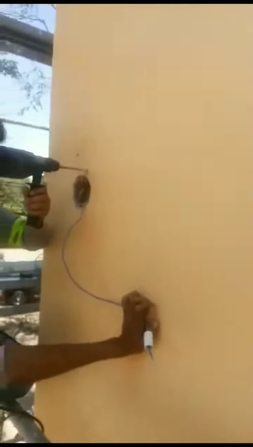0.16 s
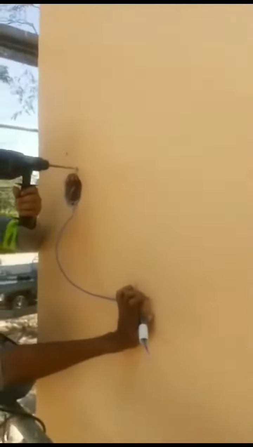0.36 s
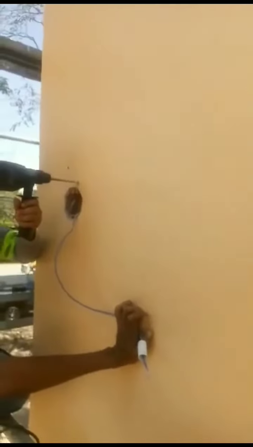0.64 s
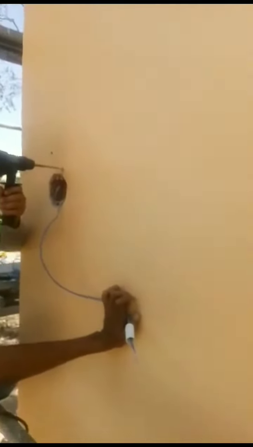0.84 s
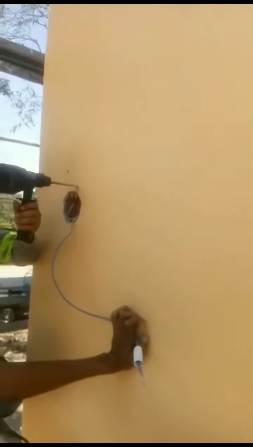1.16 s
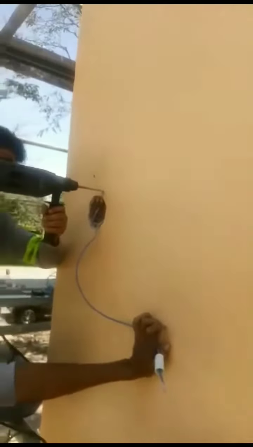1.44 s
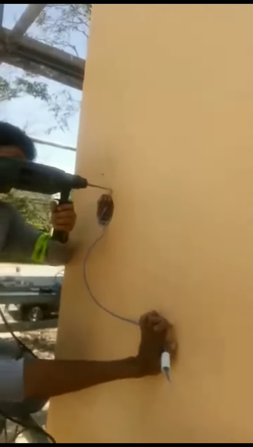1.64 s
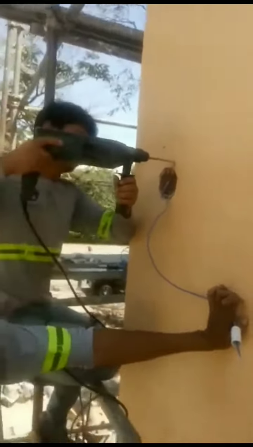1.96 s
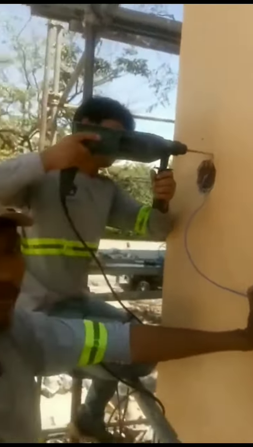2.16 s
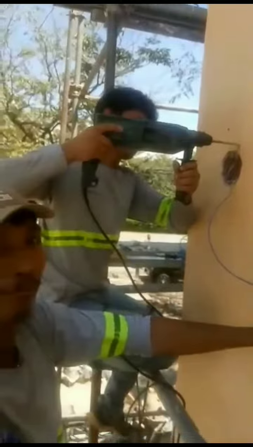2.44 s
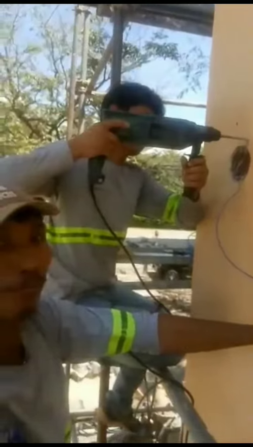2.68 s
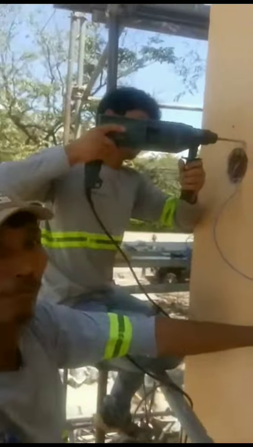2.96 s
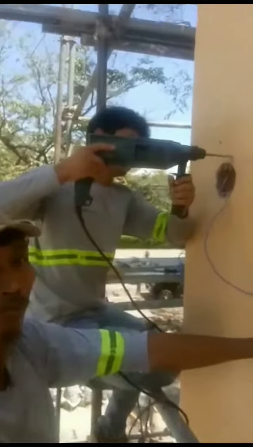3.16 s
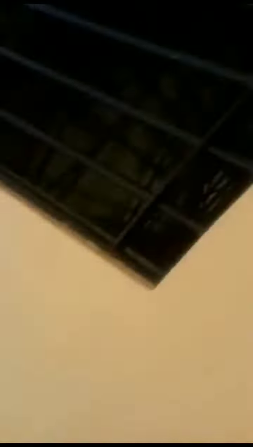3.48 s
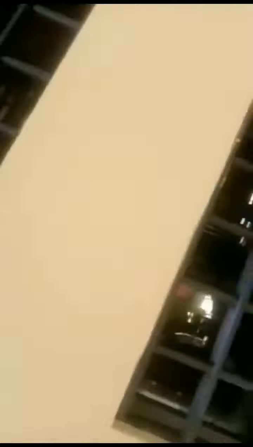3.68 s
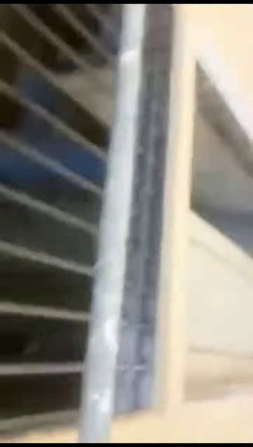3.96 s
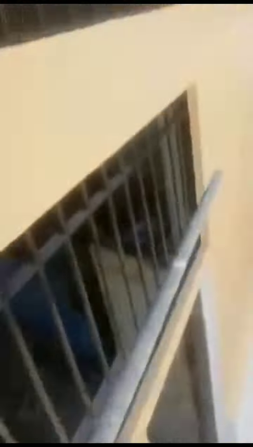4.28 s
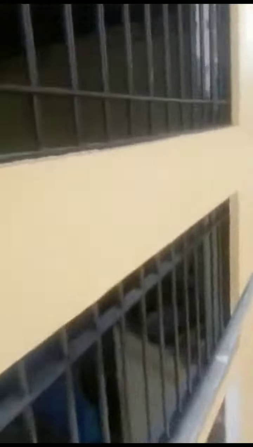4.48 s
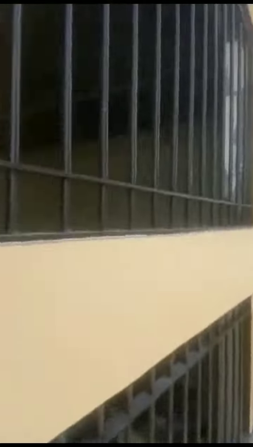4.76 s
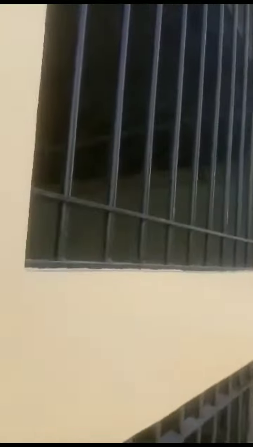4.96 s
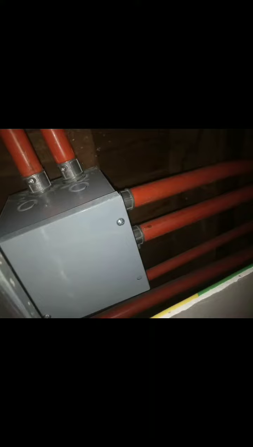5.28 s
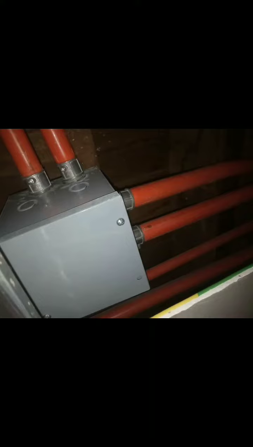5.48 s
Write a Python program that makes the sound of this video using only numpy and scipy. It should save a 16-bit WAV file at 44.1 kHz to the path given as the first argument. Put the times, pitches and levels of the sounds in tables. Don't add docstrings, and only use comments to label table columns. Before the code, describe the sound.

Harsh, buzzing hammer drilling in masonry, close to a hand-held phone, with small bumps on the casing and a sudden stop to silence.

```python
import sys
import numpy as np
from scipy import signal
from scipy.fft import rfft, irfft
from scipy.io import wavfile
from scipy.ndimage import uniform_filter1d

SR = 44100
rng = np.random.default_rng(int(sys.argv[2]) if len(sys.argv) > 2 else 0)


def generate_wav(signal):
    frames = np.transpose(np.atleast_2d(signal))
    scaled = np.clip(frames, -1, 1) * 32767
    pcm = np.round(scaled).astype(np.int16)
    wavfile.write(sys.argv[1], SR, pcm)


def volts(x):
    e = np.asarray(x, float) / 20
    return 10 ** e


N = 247842

# time in seconds, level in dB.
TOOL_LEVEL = [(0.0, -27), (0.25, -22.5), (0.8, -25), (1.1, -26), (1.7, -26), (2.25, -24), (2.6, -26),
              (3.05, -26), (3.2, -22), (3.65, -28), (3.8, -25.5), (4.05, -23.5), (4.15, -22), (4.45, -22),
              (4.8, -19), (5.05, -19)]
# time in seconds, change in dB, half length in seconds.
BITES_AND_SKIDS = [(0.39, -4, 0.05), (0.782, 2.1, 0.062), (1.247, 2, 0.039), (1.381, 3, 0.027),
                   (1.809, -3, 0.028), (1.93, 2.4, 0.019), (2.08, -2.9, 0.02), (2.393, -2, 0.043),
                   (2.758, -2, 0.011), (2.85, -2.5, 0.011), (2.917, 1.6, 0.03), (4.382, -5, 0.042),
                   (4.485, -4, 0.015), (4.747, -3.5, 0.015)]
# start in seconds, length in seconds.
PUSH_EASES = [
    (1.2483, .1893),
    (1.9122, .3311),
    (3.0655, .3326),
    (3.7391, .3037),
    (4.42, .3838),
]
# time in seconds, direction (0 at the tool, 1 a little aside, 2 turned away,
# 3 along the bars, 4 at the window).
PHONE_SWING = [(0, 0), (1.6, 1.03), (2.5, 1), (3.3, 1), (3.5, 2.5), (3.72, 2.5), (4.0, 3), (4.45, 3),
               (4.7, 3.5), (5.1, 5)]
# 0.8-2.5 kHz in dB, 7-13 kHz in dB, below 0.8 kHz in dB.
BAND_SHARES = [
    (-4.5, -7.5, -17.5),
    (-7, -10, -19.5),
    (-8, -4, -19),
    (-12, -8, -19),
    (-9, -8.5, -18),
]
# frequency in Hz, level in dB.
COLOUR_FACING = [(470, -47), (800, -23), (943, -2), (1140, -5), (1220, -2), (1680, -6), (2380, -5.5),
                 (2590, -3), (3310, -0.5), (4230, -11.5), (4930, -3), (6690, -10), (8070, -26),
                 (11200, -10), (13200, -15)]
COLOUR_ASIDE = [(470, -44), (800, -10), (1230, -4), (1560, -7), (1930, -4.5), (2170, -8), (2380, -5.5),
                (3510, -1), (4540, -10), (4930, -1), (5540, -11), (6530, -6), (7700, -12.5), (12200, -8),
                (13200, -15.5)]
COLOUR_AWAY = [(470, -39), (800, -11.5), (1060, 0.5), (1150, -14), (1440, 2), (2020, -4.5), (2350, -12.5),
               (2910, -8), (3270, -13.5), (3990, -11), (10900, -6), (12600, -6), (13200, -8.5)]
COLOUR_BARS = [(470, -44), (800, -10), (1260, -7), (1460, -7.5), (1680, -7), (2020, -11), (2590, -13.5),
               (3050, -4), (3720, -8), (4230, -1), (5540, -10), (6380, -3.5), (7790, -10.5), (12200, -10.5),
               (13200, -12)]
COLOUR_WINDOW = [(470, -43), (800, -15.5), (838, -18.5), (943, -5.5), (1230, -12), (1710, -6.5),
                 (2170, -10), (2380, -10.5), (2770, -16), (3120, -8.5), (4870, -3), (5290, -6.5),
                 (7010, -14), (12600, -16), (13200, -26)]
# frequency in Hz, level per Hz in dB.
BASS_AT_TOOL = [(21, -42.5), (35, 2), (112, -0.5), (405, -6.5), (493, -3), (608, -8), (711, 8.5), (800, -6),
                (1040, -32), (1760, -120)]
BASS_AT_WINDOW = [(21, -50.5), (35, -19), (81, -2), (237, -11), (277, -10), (562, -7), (616, -14.5),
                  (800, -2), (1040, -31), (1760, -120)]
# time in seconds, half length in seconds, frequency in Hz,
# glide in Hz per second, lift in dB.
EDGE_GLINTS = [(3.27, .09, 12000, -3000, 3.5), (3.43, .11, 4900, -11000, -3.5),
               (3.37, .07, 9700, -14000, 9), (3.64, .04, 10400, 6000, -3), (3.791, .11, 11900, 7000, 4.5),
               (4.989, .11, 12900, -0.5, -9)]
# frequency in Hz, level in dB.
GRIND_COLOUR = [(60, 0.5), (500, 1), (1500, 8.5), (4000, 0.5), (7000, 6.5), (12000, 1.5)]
STRIKE_COLOUR = [(60, -30.5), (500, -36.5), (1500, -8.5), (4000, -13.5), (7000, 1), (12000, 1.5)]
TICK_COLOUR = [(60, -40), (2000, -30), (5000, -12), (8000, -7), (12000, -1.5)]
RAM_COLOUR = [(60, -27.5), (500, 5), (1500, -18), (3000, -6.5), (6000, -4), (12000, -6)]
WALL_COLOUR = [(60, -33.5), (400, 2.5), (900, -8), (1300, 2.5), (2500, -10), (5000, -18), (12000, -28.5)]
THUD_COLOUR = [(60, -14), (130, -3), (250, -4), (450, -1.5), (700, 1), (850, -6), (1100, -14), (2000, -30)]
# frequency in Hz, level in dB, time to fall 60 dB in seconds.
BODY_RINGS = [(542, -5, 0.053), (638, -2.5, 0.081), (670.7, 4.5, 0.064), (978.4, 5, 0.11),
              (1225, -9.5, 0.059), (1259, -2.5, 0.17), (1390, 0, 0.05), (1584, 0.5, 0.035),
              (1940, -13, 0.15), (1956, 0.5, 0.23), (2380, -4, 0.04), (2427, 5, 0.14), (2810, -8.5, 0.13),
              (2954, 4, 0.28), (3265, 6, .06), (3413, 4.5, 0.071), (3634, -17.5, 0.1), (4800, 12.5, 0.089),
              (6600, 5.5, 0.034)]
# overtone of the blow rate, level under the tool in dB,
# extra level near the window in dB.
GEAR_LINES = [(1, -36, -4), (2, -34, 1), (4, -33, 4), (6, -34, 6), (8, -31, 11), (11, -31, 2)]
# time in seconds, signed peak, push length in milliseconds.
FINGER_KNOCKS = [(2.112, 0.035, 0.67), (2.140, 0.055, 1), (3.348, -0.13, 0.54), (3.446, 0.059, 0.88),
                 (3.618, -0.14, 0.52), (3.769, .045, 0.62), (3.784, 0.021, 1), (3.859, -0.085, 0.47),
                 (3.903, 0.04, 1.2), (3.931, 0.18, 0.7), (4.179, -0.047, 0.9), (4.189, 0.064, 1.9),
                 (4.207, -0.035, 1.2), (4.229, 0.045, 0.77), (4.254, 0.039, 0.87), (4.27, -0.034, 0.64),
                 (4.782, -0.013, 1), (4.949, 0.044, 2), (5.026, -0.022, 0.63)]
# time in seconds, level in dB.
FRAME_LEVEL = [(3.05, -63), (3.15, -47), (3.6, -54), (3.8, -47.5), (4.3, -46.5), (4.75, -41.5), (4.9, -32),
               (5.0, -38.5), (5.05, -43.5)]
# centre in seconds, length in seconds, lowest frequency in Hz.
TREBLE_SWAPS = [(0.055, .03, 5500), (0.131, .05, 4240), (0.312, 0.037, 5560), (0.409, 0.046, 4200),
                (1.892, 0.032, 4400), (1.977, 0.026, 4200), (2.425, 0.022, 4130), (2.485, 0.028, 4350),
                (2.556, 0.037, 6200), (2.618, 0.023, 5130), (2.789, 0.019, 6200), (2.853, .025, 4230),
                (3.337, 0.041, 7400), (3.449, 0.028, 4970), (3.633, 0.053, 4740), (3.683, 0.021, 4170),
                (3.97, 0.048, 4830), (4.038, 0.046, 4170), (4.133, 0.026, 5800), (4.217, 0.032, 4000),
                (4.296, 0.039, 4800), (4.389, .03, 5060), (4.729, 0.029, 5500), (4.901, 0.025, 5040),
                (5.01, 0.023, 4400), (5.045, 0.031, 5430)]

LOADED_PER_S, FREE_PER_S = 56.91, 73.89


def evened(x):
    return x / np.sqrt(np.mean(abs(x) ** 2) + 1e-20)


def read(points, hz):
    f, value = np.transpose(points)
    return np.interp(np.log(hz + 1), np.log(f + 1), value)


def coloured(x, points):
    hz = np.fft.rfftfreq(N, 1 / SR)
    return irfft(rfft(evened(x)) * volts(read(points, hz)), N)


def clicks(turns, spread_db, jitter_ms):
    at = np.flatnonzero(np.diff(np.floor(turns)))
    chance = rng.standard_normal((len(at), 2))
    late = (chance[:, 0] * jitter_ms * SR / 1000).astype(int)
    out = np.zeros(N)
    out[np.clip(at + late, 0, N - 1)] = volts(spread_db * chance[:, 1])
    return out


def burst(train, rise_ms, fall_ms):
    ms = np.arange(1500) / SR * 1000
    shape = (1 - np.exp(-ms / rise_ms)) * np.exp(-ms / fall_ms)
    return signal.oaconvolve(train, shape)[:N] * rng.standard_normal(N)


def blow_rate(t):
    speed_up_s, bog_down_s = .1134, .1572
    run_up = 0
    for start, length in PUSH_EASES:
        climb = 1 - np.exp(-np.clip(t - start, 0, length) / speed_up_s)
        run_up = run_up + climb * np.exp(-np.maximum(t - start - length, 0) / bog_down_s)
    return LOADED_PER_S + (FREE_PER_S - LOADED_PER_S) * run_up


def level_db(t):
    bites = sum(db * np.exp(-((t - s) / half) ** 2) for s, db, half in BITES_AND_SKIDS)
    return np.interp(t, *np.transpose(TOOL_LEVEL)) + bites


def frame():
    frame_hz, off_tune_db, travel_s = 731.6, -3.5, .012
    ring = signal.lfilter(*signal.iirpeak(frame_hz, 60, SR), rng.standard_normal(N))
    t = np.arange(N) / SR
    s, near_db = np.transpose(FRAME_LEVEL)
    off_tune = np.sin(np.pi * frame_hz / blow_rate(t - travel_s)) ** 2
    return evened(ring) * volts(np.interp(t, s, near_db, left=-90) + off_tune_db * off_tune)


def knocks():
    out = np.zeros(N)
    ms = np.arange(900) / SR * 1000
    for s, peak, length_ms in FINGER_KNOCKS:
        u = ms / length_ms * 0.82
        push = 2.42 * u * np.exp(-u)
        hard_edge = 0.79 * (ms < .25 * length_ms ** -1) * (length_ms < .9)
        start = round((s - length_ms / 1000) * SR)
        out[start:][:900] += peak * (push + hard_edge)
    return signal.lfilter(*signal.butter(2, 95, "high", fs=SR), out)


def gears():
    load_damps_db = -7
    t = np.arange(N) / SR
    rate = blow_rate(t)
    load = (FREE_PER_S - rate) / (FREE_PER_S - LOADED_PER_S)
    turns = np.cumsum(rate) / SR
    near_window = np.clip(np.interp(t, *np.transpose(PHONE_SWING)) - 2, 0, 2) / 2
    wavers_db = [1.6 * evened(uniform_filter1d(rng.standard_normal(N), size=5000)) for _ in GEAR_LINES]
    lines = 0
    for (overtone, db, extra_db), waver_db in zip(GEAR_LINES, wavers_db):
        line = np.cos(2 * np.pi * (overtone * turns + rng.random()))
        lines = lines + volts(db + extra_db * near_window + waver_db) * line
    return np.sqrt(2) * lines * volts(level_db(t) + load_damps_db * load)


def body_rings():
    s = np.arange(5000) / SR
    return sum(volts(db - 60 * s / t60) * np.sin(2 * np.pi * hz * s) for hz, db, t60 in BODY_RINGS)


def grind(ram_turns, rings):
    chatter_db = 1.01 * evened(uniform_filter1d(rng.standard_normal(N), 300))
    settle_db = -4.5 * (ram_turns % 1) ** 2
    grit = volts(chatter_db + settle_db) * rng.standard_normal(N)
    return evened(grit) + 0.13 * evened(signal.oaconvolve(grit, rings)[:N])


def thud(wall_turns):
    eased_thud = .3
    rate = blow_rate(np.arange(N) / SR)
    push = -clicks(wall_turns, spread_db=1.3, jitter_ms=.06)
    push = push * np.interp(rate, [LOADED_PER_S, FREE_PER_S], [1, eased_thud])
    hz = np.fft.rfftfreq(N, 1 / SR)
    bending = np.exp(-2j * np.pi * (.15 * np.sqrt(hz) - .0034 * hz))
    edge_echo = 1 + .5 * np.exp(-2j * np.pi * hz * .0058)
    return irfft(rfft(push) * bending * edge_echo, N)


def wall(wall_turns, rings):
    s = np.arange(5000) / SR
    crack = 0.25 * rng.standard_normal(len(s)) * np.exp(-s / 0.0031)
    train = clicks(wall_turns, spread_db=2.5, jitter_ms=0.055)
    return signal.oaconvolve(train, crack + 0.025 * rings)[:N]


def ram(ram_turns):
    return burst(clicks(ram_turns, spread_db=3.0, jitter_ms=0.28), rise_ms=0.27, fall_ms=0.53)


def tick(blows):
    return burst(blows ** 3.4, rise_ms=.1, fall_ms=.35)


def strike(blows):
    return burst(blows, rise_ms=.3, fall_ms=0.78) + 0.37 * burst(blows, rise_ms=0.82, fall_ms=2.9)


def drill():
    first_turn, strike_lead, ram_lead, wall_lead = .158, .115, .39, .085
    turns = np.cumsum(blow_rate(np.arange(N) / SR)) / SR + first_turn
    ram_turns, wall_turns = turns + ram_lead, turns + wall_lead
    blows = clicks(turns + strike_lead, spread_db=1.0, jitter_ms=0.16)
    rings = body_rings()
    out = coloured(strike(blows), STRIKE_COLOUR)
    out += coloured(ram(ram_turns), RAM_COLOUR)
    out += coloured(wall(wall_turns, rings), WALL_COLOUR)
    out += coloured(thud(wall_turns), THUD_COLOUR)
    out += coloured(tick(blows), TICK_COLOUR)
    out += coloured(grind(ram_turns, rings), GRIND_COLOUR)
    return out


def above_bass_evened(shape, hz):
    return shape / np.sqrt((shape[hz > 800] ** 2).sum(0))


def as_heard(x):
    hz, t, z = signal.stft(x, SR, nperseg=1024, noverlap=768)
    usual = np.sqrt(np.mean(abs(z) ** 2, 1))
    z = z / uniform_filter1d(usual, size=15)[:, None]

    turn = np.clip(np.interp(t, *np.transpose(PHONE_SWING)), 0, 4)
    weights = [np.maximum(1 - abs(turn - k), 0) for k in range(5)]
    colours = COLOUR_FACING, COLOUR_ASIDE, COLOUR_AWAY, COLOUR_BARS, COLOUR_WINDOW
    shape = volts(sum(read(c, hz)[:, None] * w for c, w in zip(colours, weights)))
    low, inside = hz < 800, np.clip(turn - 2, 0, 1)
    bass_db = np.outer(read(BASS_AT_TOOL, hz[low]), 1 - inside)
    bass_db += np.outer(read(BASS_AT_WINDOW, hz[low]), inside)
    shape[low] = volts(bass_db)
    for s, half, glint_hz, glide, glint_db in EDGE_GLINTS:
        off_hz = hz[:, None] - glint_hz - glide * (t - s)
        shape *= volts(glint_db * np.exp(-((t - s) / half) ** 2 - (off_hz / 900) ** 2))

    steady = [0.12, .15, .4]
    shares_db = np.transpose(BAND_SHARES) @ weights - np.outer(steady, level_db(t) + 26)
    shape = above_bass_evened(shape, hz)
    lift_db = 0
    for (lo, hi), share_db in zip([(800, 2500), (7000, 13300), (0, 800)], shares_db):
        band = (hz >= lo) & (hz < hi)
        missing_db = share_db - 10 * np.log10((shape[band] ** 2).sum(0))
        lift_db = lift_db + band[:, None] * missing_db
    shape = uniform_filter1d(shape * volts(lift_db), size=2, axis=0)
    shape = above_bass_evened(shape, hz)

    patches = uniform_filter1d(rng.standard_normal(z.shape), 18, 0)
    patches = evened(uniform_filter1d(patches, 9, 1))
    out = signal.istft(z * shape * volts(0.86 * patches), SR, nperseg=1024, noverlap=768)[1][:N]
    return evened(out) * volts(level_db(np.arange(N) / SR))


def scene():
    mono = as_heard(drill()) + knocks() + frame() + gears()
    return np.tile(mono, (2, 1))


def swap_treble(x):
    hz, t, z = signal.stft(x, SR, nperseg=1024, noverlap=768)
    swap = np.zeros(z.shape)
    for s, length, lo_hz in TREBLE_SWAPS:
        fade = np.clip(1.4 - abs(t - s) / length * 2.53, 0, 1)
        swap = np.maximum(swap, np.outer((hz > lo_hz) & (hz < 13200), fade))
    power = uniform_filter1d(uniform_filter1d(abs(z) ** 2, 12, 0), 5, 1)
    size = np.sqrt(power / 2) * swap
    a, b, c, d = rng.standard_normal((4,) + z.shape)
    mid = np.sqrt(1 - swap ** 2) * z + 1.19 * size * (a + 1j * b)
    side = 1.5 * size * (c + 1j * d)
    return signal.istft(np.array([mid + side, mid - side]), SR, nperseg=1024, noverlap=768)[1][:, :N]


def band_limit(x):
    edge_hz = 13040
    points_hz = [0, edge_hz, edge_hz + 150, edge_hz + 400, SR / 2]
    edge = signal.firwin2(801, points_hz, volts(np.array([-0.5, 0.5, -34.5, -74, -100])), fs=SR)
    x = signal.oaconvolve(x, edge[None], "same")
    return x - .15 * x ** 3


def cut_off(x):
    after = np.arange(N) / SR - 5.0492
    smear_s = [-.0004, .0004, .005, .0095, .013, .022, .05]
    smear_db = np.interp(after, smear_s, [0, -40, -46, -34, -50, -66, -100])
    return x * volts(smear_db) * (after < .1)


def low_pass(x):
    return signal.sosfilt(signal.butter(12, 13950, fs=SR, output="sos"), x)


def record(dry):
    mix = cut_off(band_limit(swap_treble(dry[0])))
    return low_pass(mix)


dry = scene()
out = record(dry)
generate_wav(out)
```